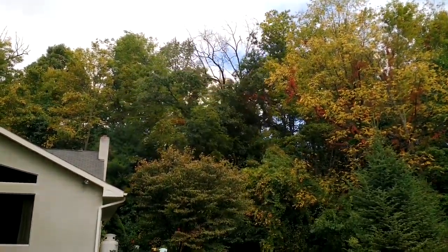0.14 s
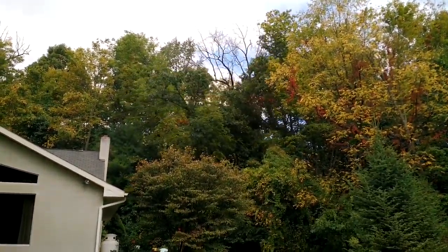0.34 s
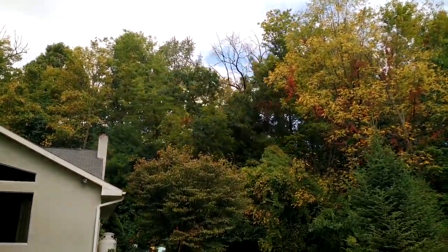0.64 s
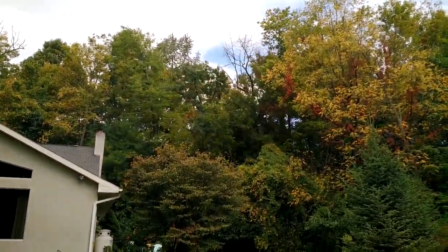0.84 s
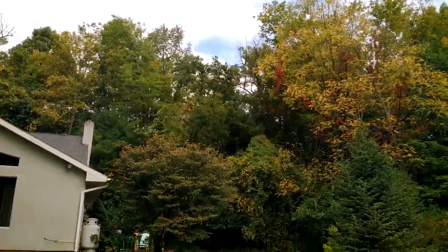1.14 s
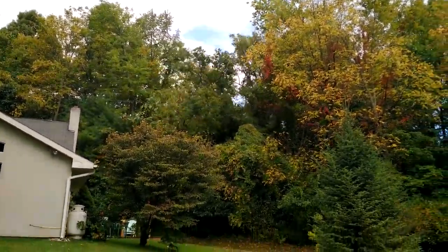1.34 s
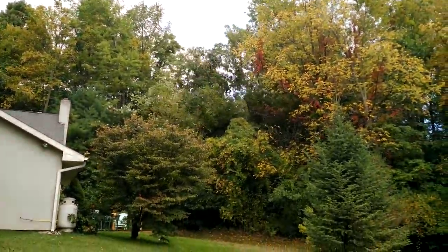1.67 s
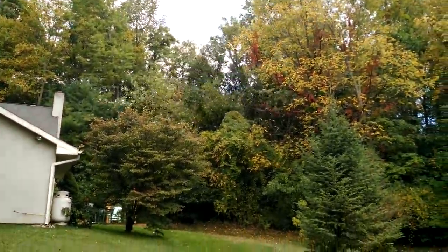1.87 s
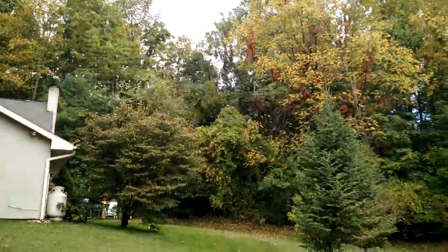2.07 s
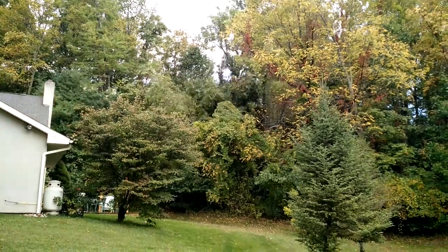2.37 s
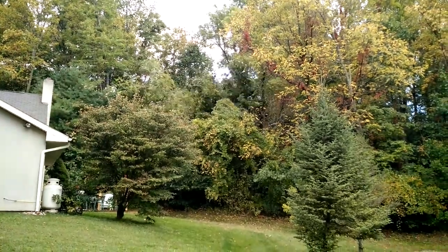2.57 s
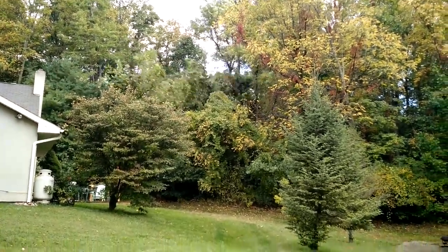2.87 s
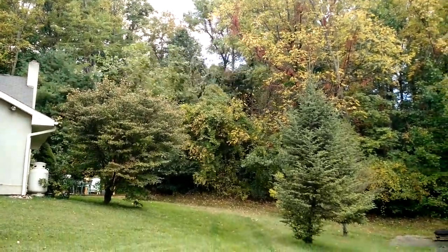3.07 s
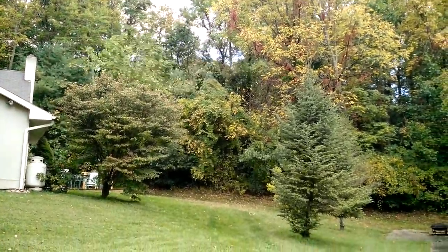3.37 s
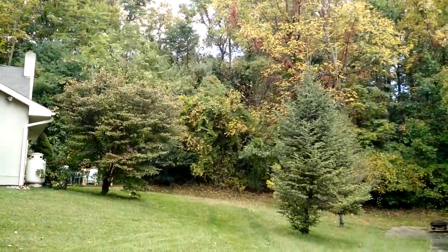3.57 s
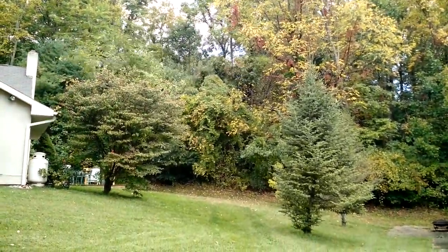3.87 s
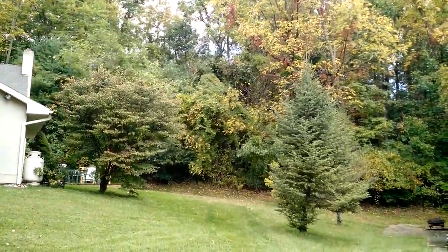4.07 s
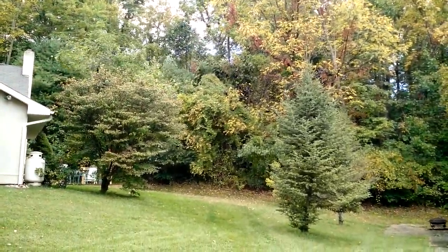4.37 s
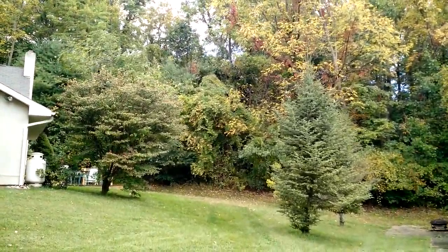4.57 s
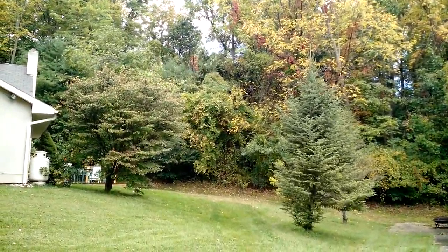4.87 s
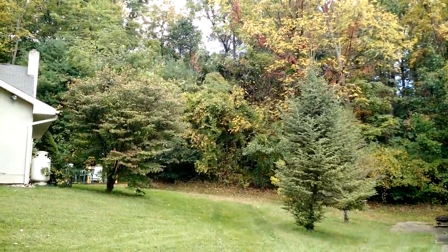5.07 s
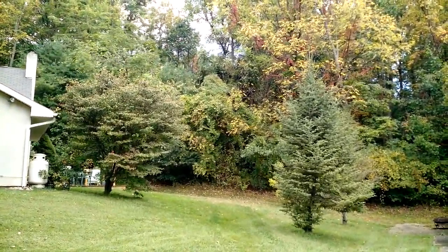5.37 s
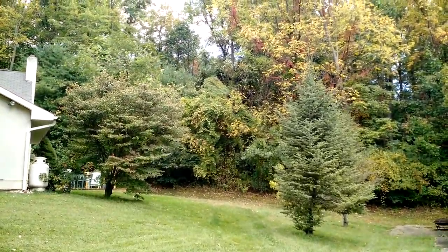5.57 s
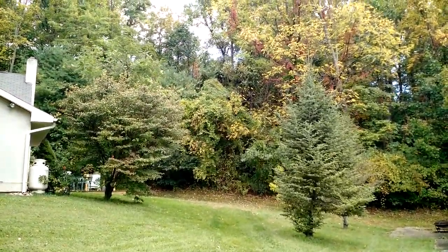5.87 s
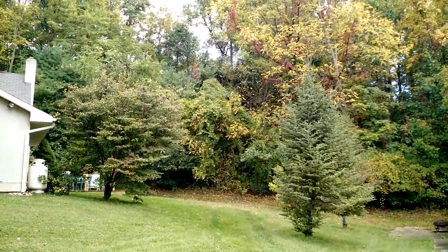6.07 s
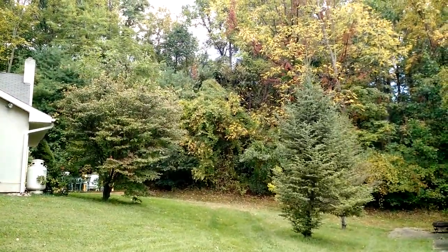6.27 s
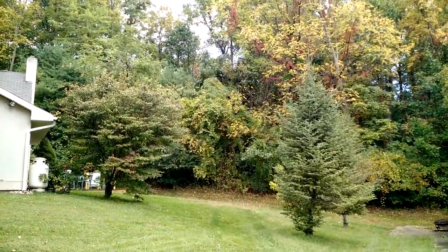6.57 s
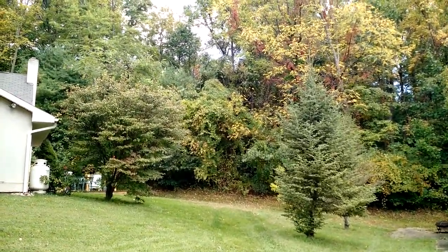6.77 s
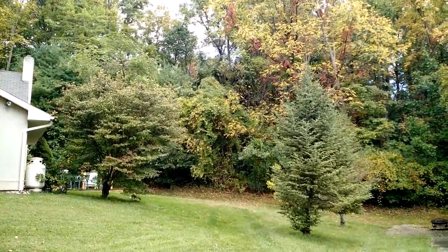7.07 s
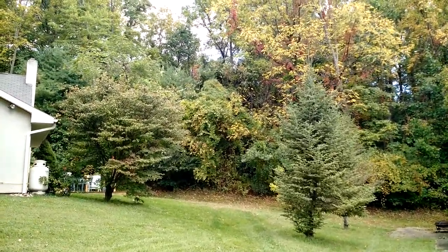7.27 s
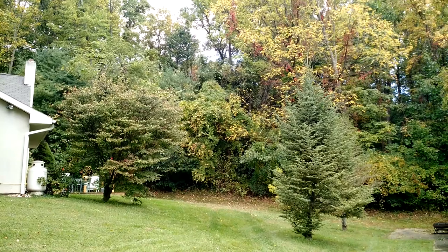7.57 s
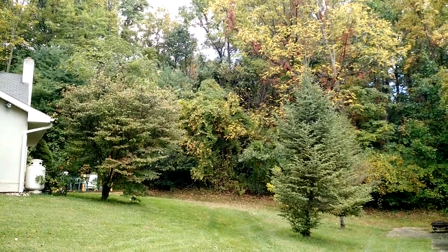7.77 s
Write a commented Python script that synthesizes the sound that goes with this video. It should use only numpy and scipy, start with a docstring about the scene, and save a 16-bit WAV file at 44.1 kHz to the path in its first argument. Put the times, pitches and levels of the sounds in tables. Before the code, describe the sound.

Outdoors at a wooded lawn edge, a few dry snaps and faint leaf rustle build quickly into a tree crash. Loud branch cracks and hollow wooden knocks cluster around two seconds, with thick leaf rush and snapping twigs. Blunt limb impacts follow, then debris patters and thins to tiny ticks. The woods echo the cracks; a slightly overloaded microphone also catches a faint low rumble.

```python
"""Autumn woods across a lawn: a dead tree falls over a low outdoor rumble.
Its crown drags through neighbouring foliage: shaped random ticks make the leaves, small volleys the twigs.
Branches snap as fibre volleys that ring the stick; heavy limbs knock and thud as damped bending modes.
Debris drums on the soil, flakes trickle down, and the drag dies away to a last few sticks.
Trunks and deep woods echo every sound of the tree, and the loudest cracks overload the microphone."""
import sys
import numpy as np
from scipy import signal
from scipy.fft import rfft, irfft
from scipy.io import wavfile
from scipy.ndimage import uniform_filter1d

SR = 44100
rng = np.random.default_rng(int(sys.argv[2]) if len(sys.argv) > 2 else 0)


def to_wav(sig):
    """Store sig (one row per channel, or 1-D mono) as 16-bit WAV at the path in sys.argv[1].

    Samples outside -1..1 are clipped; the rate is SR.
    """
    pcm = np.clip(np.atleast_2d(sig), -1, 1) * 32767
    pcm = np.round(pcm).astype(np.int16)
    wavfile.write(sys.argv[1], SR, pcm.T)  # frames by channels


N = 349713
TIME = np.arange(N) / SR

# Branches breaking, from the first lean through the crash to the last sticks:
# t/s, level/dB, tearing time/s, brightness/dB per octave, resonance f/Hz
BRANCH_SNAPS = [ (.0777, -32.5, .0018, 9.5, 2500), (0.0974, -22, 0.0033, 0.5, 3000),
                (.1408, -21.5, 0.0019, -2, 1210), (.160, -29.5, 0.0015, 8, 5030),
                (0.3542, -27.5, 0.0026, 4.5, 3100), (0.5458, -23.5, 0.0031, 0, 4700),
                (.631, -26, 0.0033, 3, 2210), (0.71, -27, 0.0051, 0, 810), (.7962, -23, 0.0026, 0, 600),
                (.8945, -27.5, 0.0031, 1, 2050), (0.9273, -18, 0.0096, 0, 2060),
                (1.0705, -25, 0.013, 7, 620), (1.1952, -15, 0.013, 0.5, 690),
                (1.2613, -18.5, 0.01, 1, 3480), (1.3962, -19.5, 0.0018, -6, 604),
                (1.4301, -18.5, 0.0052, -4.5, 1920), (1.508, -19, 0.0064, -0.5, 910),
                (1.526, -14.5, 0.0066, -3, 2220), (1.6045, -8.5, 0.0017, -1.5, 720),
                (1.7, -22.5, 0.0085, 2.5, 900), (1.748, -22, .01, -6.5, 580),
                (1.7805, -18, 0.0017, -2, 945), (1.8641, -2, 0.0021, -0.5, 2060),
                (1.8747, -8, 0.005, -2, 1800), (1.9008, -8.5, 0.0068, -.5, 865),
                (1.949, -15, .0015, -0.5, 790), (1.9973, -15.5, 0.0016, 5, 3620),
                (2.011, -11.5, 0.0049, -1, 2530), (2.0281, -13, 0.0035, 1.5, 760),
                (2.0952, -8, 0.0022, 3, 3300), (2.1839, -25, 0.0038, 0, 1000),
                (2.272, -19.5, 0.0014, 2, 3000), (2.3201, -8.5, 0.0031, 0, 1060),
                (2.34, -5, 0.0011, 0.5, 1410), (2.3606, -13, 0.0083, 1.5, 1060),
                (2.645, -10.5, 0.002, -3, 735), (2.6764, -13, 0.0015, -3.5, 1200),
                (2.724, -15, 0.0025, -3, 1500), (2.756, -14.5, 0.0048, -2.5, 634),
                (2.7766, -13.5, 0.003, -4, 1130), (2.7879, -13.5, 0.0039, -2.5, 1320),
                (2.834, -13, 0.003, -.5, 1630), (2.8551, -12, 0.0036, -3, 880),
                (3.1058, -21.5, 0.0023, 7, 4170), (3.3006, -24, 0.0051, 9, 5200),
                (3.325, -22.5, 0.0049, 1, 1150), (3.396, -21, .005, 3, 1040), (3.4478, -24, 0.004, 3, 870),
                (3.4851, -26, 0.0018, 0.5, 950), (3.7195, -28.5, 0.0031, 2.5, 1330),
                (3.884, -23, 0.0038, -0.5, 2000), (3.907, -17.5, 0.00085, 1, 2530),
                (3.9449, -23, .0035, 4.5, 1150), (4.2162, -29, 0.0034, -0.5, 3200),
                (4.3603, -29.5, 0.0071, 2.5, 885), (4.5044, -28, 0.0034, 3, 1950),
                (4.55, -31.5, 0.0034, 1.5, 1020), (4.658, -29, 0.0039, -2.5, 630),
                (4.681, -28.5, 0.0047, 4, 1850), (4.7721, -29, .005, 3, 1400),
                (4.865, -32.5, .003, 2, 2000), (5.0405, -29.5, 0.0027, 0.5, 4300),
                (5.084, -37.5, 0.0022, .5, 2000), (5.1904, -29, .003, 1.5, 1540),
                (5.3446, -28.5, 0.0036, 1.5, 2550), (5.495, -35, 0.0095, 0, 1000),
                (5.661, -39, 0.0051, 0, 890), (5.72, -34.5, 0.0038, -0.5, 1150),
                (5.7443, -32.5, 0.0025, -3.5, 1090), (5.7726, -34, 0.0034, 5, 5260),
                (6.3573, -42.5, .0017, 0, 3400), (6.4203, -45, .002, 8, 4800),
                (6.842, -52, 0.0019, 3.5, 4900), (6.906, -47, 0.0045, -2.5, 3000),
                (7.297, -53, 0.0043, 8, 4200), (7.657, -54, 0.0028, -2, 1540)]
# Heavy limbs striking trunks and soil: t/s, level/dB, resonance f/Hz, ring time/s, thud re the knock/dB
LIMB_KNOCKS = [(.143, -19, 704, 0.051, -26), (0.157, -33, 88, .09, -8), (.562, -26.5, 640, .036, -20.5),
               (1.195, -7, 690, 0.039, -7.5), (1.396, -8.5, 570, 0.022, -12), (1.429, -12, 590, 0.034, -15),
               (1.43, -5.5, 346, .045, -11), (1.527, -12, 536, 0.04, -20), (1.604, -3.5, 652, 0.049, -18),
               (1.623, -29, 72, .12, -15), (1.865, -4, 530, 0.05, -12.5), (1.907, -7.5, 507, 0.03, -18),
               (2.511, -10.5, 670, 0.045, -18), (2.518, -17.5, 151, 0.12, -16.5),
               (2.559, -16.5, 211, 0.06, -16.5), (2.71, -16, 205, .04, -21), (2.763, -17.5, 149, 0.14, -16),
               (2.856, -21, 160, .066, -15), (3.885, -25.5, 515, 0.064, -25), (4.219, -36, 75, 0.093, -12),
               (4.485, -31, 380, .014, -6), (4.657, -29, 620, 0.035, -21)]
# Spectrum of dry leaves and bark flakes: f/Hz, level per Hz/dB
LEAF_SPECTRUM = [(60, -38), (250, -17.5), (420, -17), (560, -11), (850, -10), (1400, -6.5), (2600, -3),
                 (3700, 0.5), (5200, 0), (7000, -9.5), (10000, -20), (12500, -30), (16000, -32.5)]


def undb(db):
    """Decibels to gain."""
    return 10 ** (np.asarray(db) / 20)


def unit(x):
    """Scale to rms 1."""
    return x / np.sqrt(np.mean(x ** 2) + 1e-18)


def add(out, s, x):
    """Mix x into out at time s."""
    start = int(np.clip(s * SR, 0, N - 1))
    out[start:start + len(x)] += x[:N - start]


def response(points, tilt_db=0, size=4096):
    """Causal (minimum-phase) impulse response of a spectrum, tilted in dB per octave; energy 1."""
    octave = np.log2(np.maximum(np.fft.rfftfreq(size, 1 / SR), 10))
    hz, level_db = np.transpose(points)
    level_db = np.interp(octave, np.log2(hz), level_db)
    # the tilt acts between 800 and 9000 Hz only
    level_db = level_db + tilt_db * np.clip(octave, np.log2(800), np.log2(9000))
    # folding the cepstrum onto positive time makes the response causal
    cepstrum = irfft(np.log(undb(level_db)))
    cepstrum[1:size // 2] *= 2
    impulse = irfft(np.exp(rfft(cepstrum[:size // 2], size)))
    return impulse / np.linalg.norm(impulse)


def colour(x, points):
    """Give x a spectrum, at rms 1."""
    return unit(signal.fftconvolve(x, response(points))[:N])


def walk(rate):
    """Random wander with a spread near 1: straight lines between random levels, rate a second."""
    knots = rng.standard_normal(4096)
    return np.sqrt(2) * np.interp(TIME * rate, np.arange(len(knots)), knots)


def grains(count, rate, spread_db):
    """Random clicks of either sign, rate a second, mostly small and a few large."""
    hit = rng.random(count) < rate / SR
    sign = rng.choice([-1, 1], count)
    size = np.minimum(rng.exponential(size=count), 4)
    return hit * sign * undb(spread_db * size)


def tear(length, points, tilt_db, ring_hz, ring_db=6, ring_q=4.8, count=2048):
    """One break: wood fibres give way in a quick volley that rings the stick; rms 1 over 12 ms."""
    t = np.arange(count) / SR
    length = np.clip(length, .0004, .02)
    volley = grains(count, rate=7000, spread_db=1.5) + 0.32 * rng.standard_normal(count)
    volley *= (1 - np.exp(-t / (0.23 * length))) * np.exp(-t / (2.13 * length))
    ring = signal.lfilter(*signal.iirpeak(ring_hz, ring_q, fs=SR), volley)
    volley = volley + (undb(ring_db) - 1) * ring
    x = signal.fftconvolve(volley, response(points, tilt_db, size=512))
    return x / np.sqrt(np.mean(x[:530] ** 2))


def air():
    """Low outdoor rumble: steady noise, strongest in the bass."""
    # f/Hz, level per Hz/dB
    air_spectrum = [(20, -19.5), (38, -10), (60, 5), (105, -2.5), (200, -8.5), (330, -15.5), (800, -32),
                    (4000, -32.5), (16000, -34.5)]
    return undb(-59.5) * colour(rng.standard_normal(N), air_spectrum)


def leaves(flutter_db):
    """Thousands of dry leaves brush and tick; each spray swells on its own, some brighter than others."""
    out = 0
    for tilt_db in (-1.5, 0, 1.5):
        ticks = unit(grains(N, rate=2500, spread_db=1.5))
        spray = ticks * undb(flutter_db * walk(24))
        out = out + signal.fftconvolve(spray, response(LEAF_SPECTRUM, tilt_db))[:N]
    return unit(out)


def twigs(spread_db, scrape_db, count=600):
    """Small twigs break all through the fall, each with its own pitch, over the scrape of bark on bark."""
    # f/Hz, level per Hz/dB
    twig_spectrum = [(60, -40), (220, -14.5), (390, -10), (570, 2.5), (850, -6), (1150, -4.5), (2200, -4),
                     (4500, -8.5), (7000, -28), (16000, -40.5)]
    snaps = np.zeros(N)
    for k, (when, size, length, tilt, pitch) in enumerate(rng.random((count, 5))):
        snap = tear(0.001 + 0.0035 * length, twig_spectrum, 5 * (tilt - .5),
                    ring_hz=900 * 2 ** (1.3 * pitch), ring_db=6.5, count=1024)
        # spread evenly over the scene, each up to three slots late
        s = (k + 3 * when) / count * N / SR
        add(snaps, s, undb(spread_db * size) * snap)
    scrape = colour(grains(N, rate=2200, spread_db=0.5), twig_spectrum)
    return unit(unit(snaps) + undb(scrape_db) * scrape)


def ground():
    """Debris drums on the soft forest floor: sparse, uneven clicks with a bass-heavy spectrum."""
    # f/Hz, level per Hz/dB
    soil_spectrum = [(20, -38), (38, -19.5), (55, -0.5), (130, -0.5), (240, -7), (400, -9.5), (1000, -38),
                     (16000, -75.5)]
    return colour(grains(N, rate=500, spread_db=4.0), soil_spectrum)


def trickle(db, spread_db, count=110):
    """Loose flakes of bark and dry leaves tick down through the foliage at random moments."""
    out = np.zeros(N)
    for when, size in rng.random((count, 2)):
        flake = tear(.002, LEAF_SPECTRUM, tilt_db=-2.5, ring_hz=4500, ring_db=1)
        add(out, when * N / SR, undb(db + spread_db * size) * flake)
    return out


def branches():
    """The big snaps; thick branches sound dull and thin ones bright."""
    # f/Hz, level per Hz/dB
    crack_spectrum = [(40, -36), (200, -13), (390, -9.5), (560, -1), (1000, 2.5), (1800, 3), (3000, 2.5),
                      (4800, 2.5), (6500, -8), (9000, -21), (12000, -27.5), (16000, -38.5)]
    out = np.zeros(N)
    for s, db, length, tilt_db, hz in BRANCH_SNAPS:
        add(out, s, undb(db) * tear(length, crack_spectrum, tilt_db, hz))
    return out


def shaking(blows, rise_s, decay_s, count=44100):
    """Envelope of the stir after each blow: it swells quickly and dies away; overlapping stirs add in power."""
    growth = 0.87  # dB of stir gained per dB of blow
    power, t = np.zeros(N), np.arange(count) / SR
    stir = (1 - np.exp(-t / rise_s)) * np.exp(-t / decay_s)
    for s, db, *_ in blows:
        add(power, s, (undb(growth * db) * stir) ** 2)
    return np.sqrt(power)


def knock(hz, t60, count=8192):
    """A rough blow rings a limb's heavily damped bending modes; peak 1."""
    t = np.arange(count) / SR
    ring = np.zeros(count)
    for ratio, mode_db in [(1, 4.5), (1.45, -11), (2.3, -24)]:
        # higher modes die sooner
        decay = undb(-60 * t * ratio / max(t60, .005))
        ring += undb(mode_db) * np.cos(2 * np.pi * hz * ratio * t) * decay
    # bark gives a little, so the push is soft and stutters
    contact = np.exp(-t * hz) * (1 + 3 * rng.standard_normal(count)) * np.sin(np.pi * t * hz)
    x = signal.fftconvolve(ring, contact)[:count]
    return x / np.abs(x).max()


def limbs():
    """Each heavy limb knocks, and the trunk or soil that it strikes thuds below it."""
    thud_ratio = 0.52  # pitch of the thud re the knock
    out = np.zeros(N)
    for s, db, hz, t60, thud_db in LIMB_KNOCKS:
        thud = undb(thud_db) * knock(thud_ratio * hz, t60)
        add(out, s, undb(db) * (knock(hz, t60) + thud))
    return undb(-0.5) * out


def echoes(near_db, near_s, far_db, t60, count=44100):
    """From one spot, nearby trunks return a spray of echoes; the deep woods add a diffuse tail."""
    t = np.arange(count) / SR
    onset = np.clip((t - .003) / .006, 0, 1)
    trunks = grains(count, rate=1200, spread_db=5) * onset * np.exp(-t / near_s)
    tail = rng.standard_normal(count) * onset * undb(-60 * t / t60)
    near = undb(near_db) * trunks / np.linalg.norm(trunks)
    far = undb(far_db) * tail / np.linalg.norm(tail)
    return near + far


def woods(x, count=8):
    """The action steps round spots in the wide crown, 45 a second, and every spot has its own echoes."""
    spot = np.floor(TIME * 45) % count
    out = 0
    for k in range(count):
        here = x * uniform_filter1d(1. * (spot == k), size=256)  # short crossfades
        spot_echoes = echoes(near_db=-12.5, near_s=.035, far_db=-8.5, t60=1.0)
        out = out + signal.fftconvolve(here, spot_echoes)[:N]
    return out


def scene():
    """The fall inside the woods over the rumble; drag and blows stir leaves, twigs and debris."""
    # How hard the crown drags through the foliage: t/s, drag level/dB
    crown_drag = [(0.0, -38), (0.13, -36), (0.22, -35.5), (1.98, -20), (2.73, -19.5), (2.93, -23),
                  (3.37, -27), (3.51, -31), (3.9, -28.5), (4.04, -32.5), (4.32, -35), (4.7, -33.5),
                  (4.89, -36), (5.29, -34.5), (5.71, -39.5), (5.89, -43.5), (6.6, -51), (7.92, -55.5)]
    drag_db = np.interp(TIME, *np.transpose(crown_drag))
    crash_db = -20  # drag at which the twig and debris levels below are set
    drop_s = .12  # debris reaches the ground this long after the crown tears it loose
    landing_db = np.interp(TIME - drop_s, TIME, drag_db)

    # every snap shakes the sprays around it and every knock shakes debris down
    shake = shaking(BRANCH_SNAPS, rise_s=0.022, decay_s=0.056)
    debris = shaking(LIMB_KNOCKS, rise_s=.01, decay_s=0.074)

    # twigs and debris grow faster than the leaf rustle: 1.446 and 1.6 dB per dB of drag
    leaf_gain = np.hypot(undb(-1 + drag_db), undb(-11.5) * shake)
    twig_gain = np.hypot(undb(-24.5 + 1.446 * (drag_db - crash_db)), undb(-20) * shake)
    ground_gain = np.hypot(undb(-37.5 + 1.6 * (landing_db - crash_db)), undb(-25.5) * debris)

    crown = leaf_gain * leaves(flutter_db=1.12) + twig_gain * twigs(spread_db=12, scrape_db=-5.5)
    tree = crown + branches() + trickle(db=-66.0, spread_db=9.5) + ground_gain * ground()
    knocks = limbs()
    # the knocks echo less than the cracks
    heard = tree + knocks + woods(tree + undb(-6.0) * knocks)
    return (heard + air())[None]


def record(dry):
    """The microphone drops the deepest bass, the loudest cracks saturate, and the top is cut."""
    x = signal.sosfilt(signal.butter(4, 40, "high", fs=SR, output="sos"), dry)
    x = x / (1 + x ** 6) ** (1 / 6)  # nearly clean until close to full scale
    return signal.sosfilt(signal.ellip(10, .2, 80, 15650, fs=SR, output="sos"), x)


dry = scene()
out = record(dry)
to_wav(out)
```